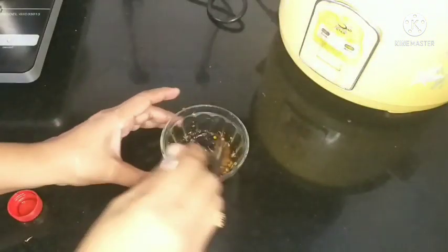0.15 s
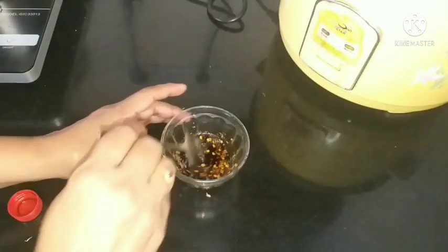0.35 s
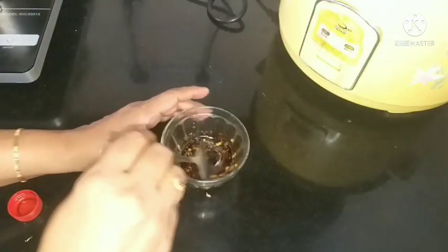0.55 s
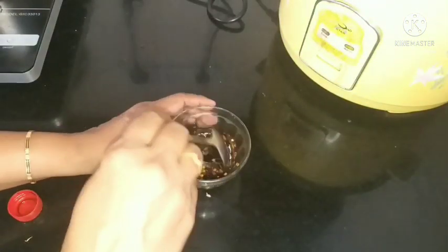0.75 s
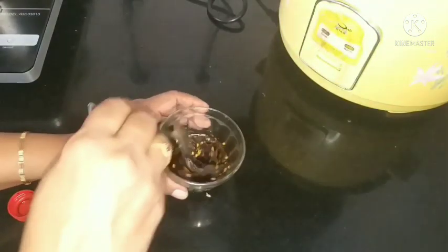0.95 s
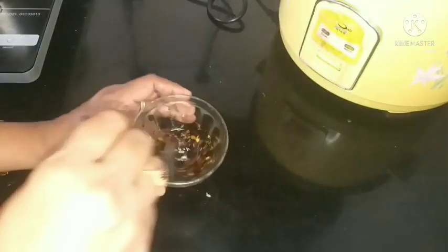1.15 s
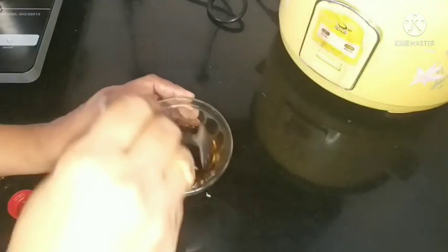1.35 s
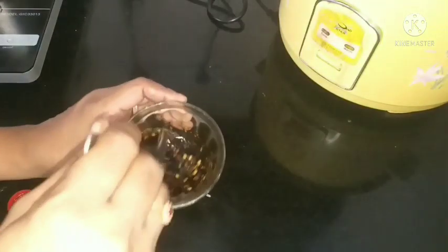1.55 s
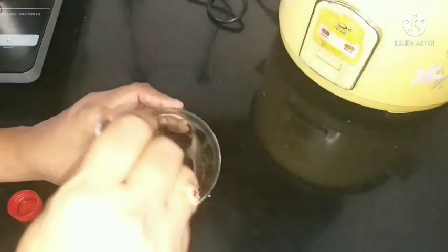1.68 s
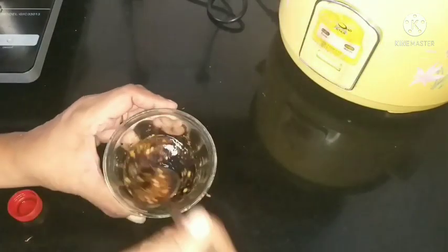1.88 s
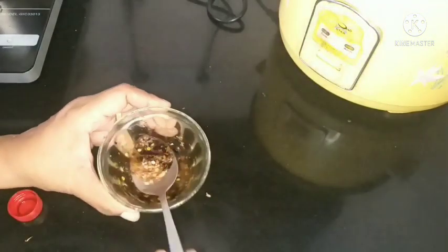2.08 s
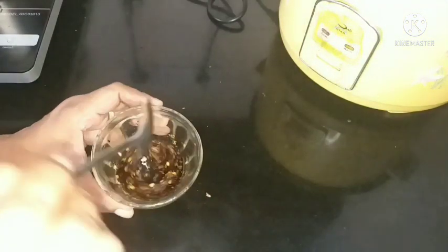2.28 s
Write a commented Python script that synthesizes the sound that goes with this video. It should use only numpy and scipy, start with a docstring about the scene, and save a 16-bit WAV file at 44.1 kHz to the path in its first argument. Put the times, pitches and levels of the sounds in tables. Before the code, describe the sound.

A metal spoon clinks and scrapes in a small glass bowl, stirring runny sauce

```python
"""A steel spoon stirs runny sauce in a small hand-held glass bowl, over steady low filtered-noise hum.
The loose spoon sings briefly (swelling sines), then knocks on the bowl: bursts of noise through resonances.
Its harder blows ring the glass as decaying pairs of sines; between them it scrapes in trains of tiny slips
while gliding sine bubbles squelch faintly. Late on, dull decaying sines bump the bowl, then a last bright
blow lands. A small hard room, made of decaying noise, answers every sound but the hum."""
import sys
import numpy as np
from scipy import signal
from scipy.fft import rfft, irfft, next_fast_len
from scipy.io import wavfile

SR = 44100
rng = np.random.default_rng(int(sys.argv[2]) if len(sys.argv) > 2 else 0)


def put_to_file(sound):
    """Save the sound as 16-bit audio at rate SR, in the file named by the first command-line argument."""
    columns = np.atleast_2d(sound).T  # one column per channel
    safe = np.clip(columns, -1, 1)
    whole_steps = np.round(safe * 32767)
    wavfile.write(sys.argv[1], SR, whole_steps.astype(np.int16))


N = 103635


def amp(db):
    """Decibels to gain."""
    return 10 ** (np.asarray(db) / 20)


def unit(x):
    """Scaled to rms 1."""
    return x / np.sqrt(np.mean(x ** 2) + 1e-20)


def fade(t, t60):
    """Exponential decay by 60 dB in t60 seconds."""
    return np.exp(-np.log(1000) * t / t60)


def along(points, hz):
    """(Hz, value) points interpolated on a log-frequency axis."""
    point_hz, value = np.transpose(points)
    return np.interp(np.log(hz + 1), np.log(point_hz + 1), value)


def add(track, start_s, x):
    """Mix x into the track at start_s."""
    i = max(round(start_s * SR), 0)
    track[i:i + len(x)] += x[:max(N - i, 0)]


def filtered(x, gain):
    """x through a zero-phase gain of frequency."""
    size = next_fast_len(N + SR // 4)
    hz = np.fft.rfftfreq(size, 1 / SR)
    return irfft(rfft(x, size) * gain(hz), size)[..., :N]


# Reverberation of the room. Each row: frequency in Hz, t60 in seconds.
ROOM_DECAY = [(300, 0.22), (1300, 0.42), (4000, 0.31), (9000, 0.31), (15000, 0.17)]
TAIL_DELAY_S, RING_WET_DB, KNOCK_WET_DB, SCRAPE_WET_DB = .005, -9, -6, -5.5


def in_room(x, wet_db):
    """Direct sound plus a delayed, fresh noise tail that decays at its own rate in each band."""
    hz, t, bands = signal.stft(rng.standard_normal(SR // 2), SR, nperseg=256)
    decay = amp(-60 * t / along(ROOM_DECAY, hz)[:, None])
    tail = signal.istft(bands * decay, SR)[1]
    tail = amp(wet_db) * tail / np.linalg.norm(tail)
    gap = np.zeros(round(TAIL_DELAY_S * SR))
    return signal.fftconvolve(x, np.concatenate([[1], gap, tail]))


BASS_HZ, MID_HZ, TREBLE_HZ = 1500, 3520, 8800  # tone is set at the outer two, relative to the middle


def tone(hz, bass_db, treble_db):
    """Gain by which one contact is darker or brighter than the others."""
    return amp(along([(BASS_HZ, bass_db), (MID_HZ, 0), (TREBLE_HZ, treble_db)], hz))


# Spoon pressed on glass. Each row: resonance in Hz, width in Hz before doubling, relative level in dB.
SPOON_MODES = [(951, 140, -3.5), (1080, 65, -1), (1594, 420, -2.5), (1733, 134, 1), (2490, 420, -10),
               (2762, 110, -4.5), (3000, 99, -5), (3190, 25, -10.5), (3456, 76, -6), (4036, 140, -2),
               (4680, 190, -10), (5405, 200, -9), (6153, 63, -6), (7220, 90, -4.5), (10320, 140, -8.5),
               (12740, 130, -15.5), (13900, 160, -12.5)]
# Broad colour of a contact. Each row: frequency in Hz, level in dB.
CONTACT_COLOUR = [(100, -60.5), (450, -29), (700, -14), (1000, -15), (1700, -7.5), (3500, -2.5),
                  (5500, -9.5), (8500, -11), (11000, -10.5), (15000, -13)]


def spoon_response(body_db, bass_db, treble_db, contact_hz, boost_db, q, size=4096):
    """Minimum-phase answer of spoon and bowl to one tiny impact, energy 1."""
    hz = np.fft.rfftfreq(size, 1 / SR)

    def peak(center_hz, width_hz):
        """Power of a resonance, 1 at its centre."""
        damping = (hz * width_hz) ** 2
        return damping / ((center_hz ** 2 - hz * hz) ** 2 + damping)

    power = amp(along(CONTACT_COLOUR, hz)) ** 2
    for mode_hz, width_hz, db in SPOON_MODES:
        power = power + amp(db + body_db) ** 2 * peak(mode_hz, 2 * width_hz) ** 2
    power = power * (1 + amp(boost_db) ** 2 * peak(contact_hz, contact_hz / q))
    magnitude = np.sqrt(power) * tone(hz, bass_db, treble_db)
    # folding the cepstrum makes the response causal
    cepstrum = irfft(np.log(magnitude + 1e-6))
    cepstrum[1:size // 2] *= 2
    cepstrum[size // 2 + 1:] = 0
    response = irfft(np.exp(rfft(cepstrum)))
    return response / np.linalg.norm(response)


# Spectrum of the hum. Each row: frequency in Hz, relative level in dB.
HUM_SPECTRUM = [(20, -39), (40, -22), (65, -10.5), (95, -4.5), (170, -0.5), (260, -5), (430, -4.5),
                (700, -11.5), (1100, -13.5), (2400, -24.5), (4000, -36.5), (7300, -39.5), (16000, -47.5)]
HUM_RMS_DB = -51


def hum():
    """Steady low background: noise shaped by a fixed spectrum."""
    noise = rng.standard_normal(N)
    return amp(HUM_RMS_DB) * unit(filtered(noise, lambda hz: amp(along(HUM_SPECTRUM, hz))))


# Free modes of the loose spoon. Each row: frequency in Hz, relative level in dB.
LOOSE_SPOON_MODES = [(1110, -7), (1720, -2.5), (2670, -3), (3590, -0.5), (4750, -14), (6130, -14)]
PICKUP_S, PICKUP_WIDTH_S, PICKUP_DB = 0.098, 0.0085, -40.5  # width: from peak to 1/e


def pickup():
    """A light brush swells the free modes of the spoon before the hand grips it."""
    out, t = np.zeros(N), np.arange(SR // 4) / SR
    ring = np.zeros(len(t))
    for hz, db in LOOSE_SPOON_MODES:
        ring += amp(db) * np.sin(2 * np.pi * (hz * t + rng.random()))
    swell = np.exp(-((t - PICKUP_S) / PICKUP_WIDTH_S) ** 2)
    add(out, 0, amp(PICKUP_DB) * in_room(ring * swell, RING_WET_DB))
    return out


# The hand shifts the bowl. Each row: start in seconds, level in dB, pitch in Hz.
BOWL_BUMPS = [(1.66, -38.5, 225), (1.666, -48, 400), (1.783, -35, 250)]
BUMP_T60_S = .08


def bumps():
    """Soft low knocks of the bowl in the hand: sines with a soft onset and quick decay."""
    out, t = np.zeros(N), np.arange(SR // 8) / SR
    envelope = fade(t, BUMP_T60_S) * (1 - fade(t, BUMP_T60_S / 2))
    for start_s, db, hz in BOWL_BUMPS:
        thud = np.sin(2 * np.pi * hz * t) * envelope
        add(out, start_s, amp(db) * in_room(thud, KNOCK_WET_DB))
    return out


SAUCE_RMS_DB = -61.5
BUBBLES_PER_S, BUBBLE_HZ, BUBBLE_CYCLES = 60, 1031, 8.2  # at most 16 bubbles a stroke


def sauce(glide=.25, spread=.4):
    """Small bubbles, rising in pitch, break during each scraping stroke of the spoon."""
    out, t = np.zeros(N), np.arange(SR // 20) / SR
    for start_s, length_s, *_ in SCRAPE_STROKES:
        bubbles = rng.random((16, 3))[:round(BUBBLES_PER_S * length_s)]
        for when, pitch, strength in bubbles:
            cycles = BUBBLE_HZ * np.exp(2 * spread * (2 * pitch - 1)) * t
            age = cycles / BUBBLE_CYCLES
            envelope = strength * age * np.exp(-2 * np.pi * age)
            bubble = envelope * np.sin(2 * np.pi * cycles * (1 + glide * age / 2))
            add(out, start_s + when * length_s, bubble)
    return amp(SAUCE_RMS_DB) * unit(in_room(out, SCRAPE_WET_DB)[:N])


# Scraping strokes. Each row: start in seconds, length in seconds, level in dB, bass in dB, treble in dB,
# squeal in Hz, squeal boost in dB.
SCRAPE_STROKES = [(0.062, 0.065, -51.5, 3, 12, 1730, 4.5), (0.141, 0.073, -42.5, -18, 13, 1030, 37),
                  (0.397, 0.11, -48.5, -1.5, -5, 1670, -11), (0.467, 0.065, -37.5, 8, 0, 2980, 9.5),
                  (0.636, 0.071, -33.5, 2.5, -5, 1720, 12), (0.761, 0.041, -35.5, -2, -6, 2954, 18.5),
                  (0.803, .10, -40.5, 18, -2, 1090, -9.5), (0.887, 0.085, -38.5, 4.5, 12, 1603, 20),
                  (1.05, 0.049, -35.5, -6, 1, 2820, 12.5), (1.104, 0.1, -47.5, -11, -3.5, 1790, 11.5),
                  (1.153, .022, -24, -18, -3, 7420, 14), (1.265, 0.087, -38.5, -4.5, -23, 3040, 5),
                  (1.317, .14, -42.5, -5, -1.5, 9980, -1), (1.463, 0.013, -25, -5.5, 4, 4000, 8.5),
                  (1.488, 0.076, -41, 4.5, -4, 11050, 14.5), (1.717, .075, -42, -18.5, -1, 3120, 8.5),
                  (1.80, 0.11, -45, 4, -7, 3830, 15), (1.897, 0.19, -52, -4.5, 0, 1800, -1)]
SLIPS_PER_S, SLIP_SPREAD_DB, STROKE_SHAPE = 1800, 6, 0.89  # shape: exponent of the half-sine pressure
SCRAPE_BODY_DB, SQUEAL_Q = 10, 10  # body: spoon modes over the broad colour


def scrapes():
    """The spoon drags over the glass in tiny uneven slips that swell and fade with each stroke."""
    out, t = np.zeros(N), np.arange(SR // 4) / SR
    for start_s, length_s, db, bass_db, treble_db, squeal_hz, boost_db in SCRAPE_STROKES:
        happens = rng.random(len(t)) < SLIPS_PER_S / SR
        sign = rng.choice([-1, 1], len(t))
        slips = happens * sign * amp(SLIP_SPREAD_DB * rng.standard_normal(len(t)))
        pressure = np.abs(np.sin(np.pi * np.minimum(t / length_s, 1))) ** STROKE_SHAPE
        response = spoon_response(SCRAPE_BODY_DB, bass_db, treble_db, squeal_hz, boost_db, SQUEAL_Q)
        rub = signal.fftconvolve(unit(slips) * pressure, response)
        add(out, start_s, amp(db) * in_room(rub, SCRAPE_WET_DB))
    return out


# Blows that ring the glass. Each row: start in seconds, level in dB, bass in dB, treble in dB,
# ring length 0-1 (scales every decay), level of the side modes in dB.
GLASS_BLOWS = [(.2288, -9.5, 0, 0, 1, -40), (.5897, -10.5, -4, -9, .9, -45), (.360, -27, -3, -4, .8, -20),
               (.8812, -31, 0, 0, .3, -15), (1.1545, -22, -3, 5, .25, -30), (1.8747, -24, 2, 0, .4, -10),
               (2.019, -18, -14, 4, .5, 0)]
# Modes of the bowl. Each row: frequency in Hz, relative level in dB, t60 in seconds at ring length 1,
# kind (0 = rim mode, 1 = side mode that only some points of contact excite).
GLASS_MODES = [(1752, -4, .35, 0), (4146, 0, .27, 0), (7335, -6, .19, 0), (11268, -17, .22, 0),
               (3745, -7, .14, 1), (3833, -1, .32, 1), (3905, -5, .2, 1), (4080, -5, .18, 1),
               (5324, -14, .14, 1), (7445, -7, .28, 1), (8060, -17, .2, 1), (9625, -22, .2, 1),
               (11990, -26, .14, 1)]
SPLIT_HZ, TWIN_DB, RISE_S = 5.6, -8, 0.00081  # each mode has a weaker twin just below it
# extra ring, mostly treble, that dies while the spoon still touches; level at MID_HZ, t60 at ring length 1
BITE_DB, BITE_DB_PER_OCTAVE, BITE_T60_S = -9, 17, .055


def clinks():
    """The glass rings in close pairs of modes, cut short by the hand and the spoon."""
    out, t = np.zeros(N), np.arange(SR // 2) / SR
    rise = 1 - np.exp(-t / RISE_S)
    for start_s, db, bass_db, treble_db, length, side_db in GLASS_BLOWS:
        ring = np.zeros(len(t))
        for hz, mode_db, t60_s, side in GLASS_MODES:
            phase, twin_phase = rng.uniform(0, 2 * np.pi, 2)
            pair = np.sin(2 * np.pi * hz * t + phase)
            pair += amp(TWIN_DB) * np.sin(2 * np.pi * (hz - SPLIT_HZ) * t + twin_phase)
            bite_db = BITE_DB + BITE_DB_PER_OCTAVE * np.log2(hz / MID_HZ)
            decay = fade(t, t60_s * length) + amp(bite_db) * fade(t, BITE_T60_S * length)
            ring += amp(mode_db + side * side_db) * tone(hz, bass_db, treble_db) * pair * decay
        add(out, start_s, amp(db) * in_room(ring * rise / 2, RING_WET_DB))
    return out


# Knocks on the bowl. Each row: start in seconds, level in dB, bass in dB, treble in dB, t60 in seconds,
# resonance at the point of contact in Hz, its boost in dB.
SPOON_KNOCKS = [(0.167, -33.5, -1.5, -1, 0.084, 3320, 11.5), (0.18, -37.5, -7.5, -22, 0.089, 980, 9),
                (0.191, -40.5, 0, 5, 0.038, 7330, 1), (0.2277, -13, -0.5, 0.5, 0.068, 3820, 14),
                (0.237, -20.5, 15, 6, 0.059, 984, 6), (.348, -28, -17, -6, .03, 1780, 18),
                (0.3599, -16, 3.5, -16.5, 0.039, 2480, 4), (0.5894, -21.5, 7, -7.5, 0.1, 965, 1.5),
                (.697, -41.5, 7.5, -0.5, 0.08, 1720, 9.5), (0.7585, -26.5, 4, -9.5, 0.091, 884, 5),
                (0.8816, -23.5, -4.5, -18.5, 0.084, 1480, 9), (0.89, -27, 6, -1, 0.051, 2350, 17),
                (.940, -32.5, 1, -6.5, 0.05, 2590, 31.5), (0.99, -41.5, -4, -9, 0.04, 4160, 3.5),
                (1.0545, -29.5, -4, -16, 0.019, 2800, 7), (1.1528, -25.5, -8, -4, 0.065, 6040, 14.5),
                (1.2489, -15.5, -4.5, -9.5, 0.041, 2770, 5), (1.2555, -25.5, -13, -11, 0.039, 4700, 5),
                (1.322, -47, -3.5, 4.5, 0.046, 2904, 7), (1.398, -38.5, -9.5, -1.5, .05, 4400, 4.5),
                (1.4935, -28, -2, 3, 0.041, 1220, 15), (1.756, -38, -15, -5, 0.045, 5650, 12.5),
                (1.830, -26.5, -2.5, -1, 0.039, 3940, 6.5), (1.8745, -16.5, -2.5, -7.5, 0.064, 1370, 7),
                (1.886, -21.5, -4, -4, 0.096, 1500, -6.5), (1.892, -19, -6.5, -4, 0.048, 5620, 12),
                (2.019, -10.5, -5, 10, 0.041, 4110, 18.5), (2.043, -18.5, -6, 10, 0.043, 5190, 8.5)]
KNOCK_BODY_DB, CONTACT_Q = 3, 11.6
TICK_DB, TICK_T60_S = 2, 0.0027  # tick level over the chatter at onset


def knocks():
    """Each knock is a sharp tick and a short, dying chatter of steel on glass."""
    out, t = np.zeros(N), np.arange(SR // 10) / SR
    tick = amp(TICK_DB) * fade(t, TICK_T60_S)
    for start_s, db, bass_db, treble_db, t60_s, contact_hz, boost_db in SPOON_KNOCKS:
        chatter = rng.standard_normal(len(t)) * (fade(t, t60_s) + tick)
        response = spoon_response(KNOCK_BODY_DB, bass_db, treble_db, contact_hz, boost_db, CONTACT_Q)
        blow = signal.fftconvolve(chatter, response)
        add(out, start_s, amp(db) * in_room(blow, KNOCK_WET_DB))
    return out


# Stereo width: gain of the blurred mix, opposite in left and right. Each row: frequency in Hz, gain in dB.
SIDE_SPECTRUM = [(300, -52.5), (700, -54), (1300, -34.5), (2500, -14), (4000, -45), (7500, -33.5),
                 (12000, -19)]
# Lean to the left. Each row: frequency in Hz, left over right in dB.
LEFT_LEAN = [(600, 0), (900, .6), (1300, 2.4), (2000, .2), (3000, 0)]


def scene():
    """All sources sit in the middle, midrange slightly left; a noise-blurred copy adds a trace of width."""
    mix = hum() + knocks() + clinks() + scrapes() + sauce() + pickup() + bumps()
    blur = unit(rng.standard_normal(SR // 100)) / np.sqrt(SR // 100)  # 10 ms of noise, energy 1
    blurred = signal.fftconvolve(mix, blur)[:N]
    side = filtered(blurred, lambda hz: amp(along(SIDE_SPECTRUM, hz)))
    stereo = filtered(mix, lambda hz: amp(np.outer([.5, -.5], along(LEFT_LEAN, hz))))
    return stereo + np.array([side, -side])


CEILING, TOP_HZ = .95, 15620


def record(dry):
    """Peaks are rounded off smoothly below the ceiling, then all above the band limit is removed."""
    rounded = dry / (1 + np.abs(dry / CEILING) ** 4) ** (1 / 4)
    return filtered(rounded, lambda hz: hz < TOP_HZ)


dry = scene()
out = record(dry)
put_to_file(out)
```